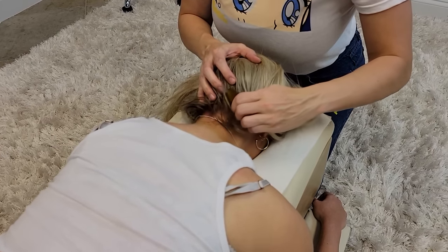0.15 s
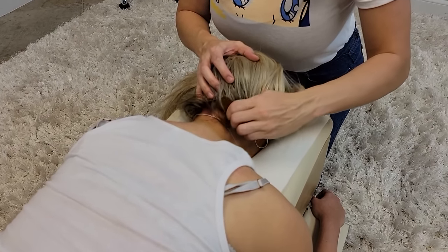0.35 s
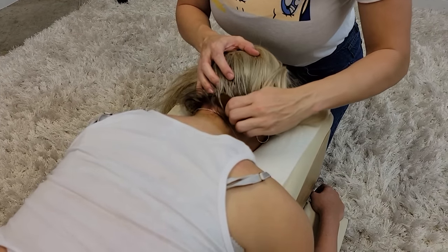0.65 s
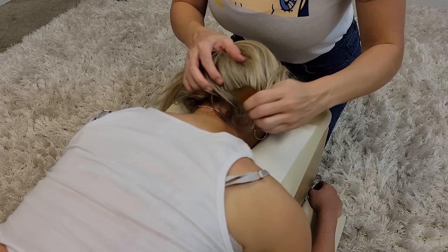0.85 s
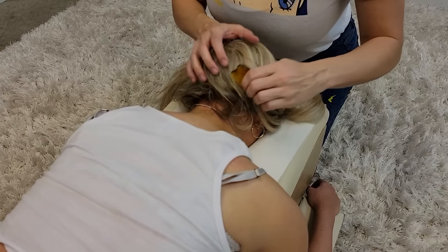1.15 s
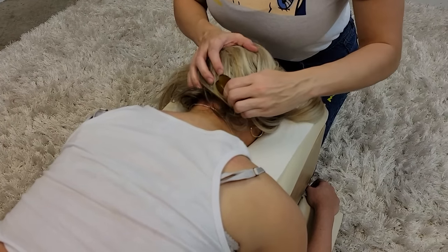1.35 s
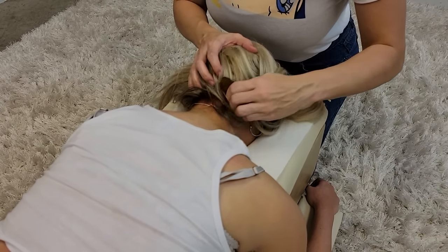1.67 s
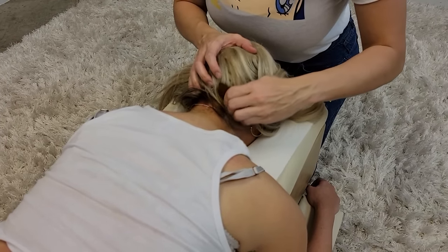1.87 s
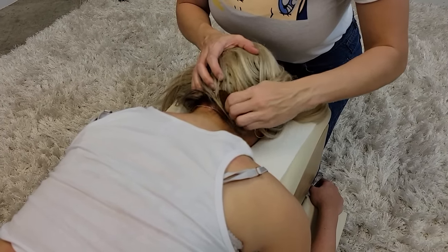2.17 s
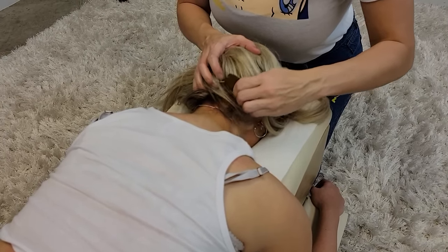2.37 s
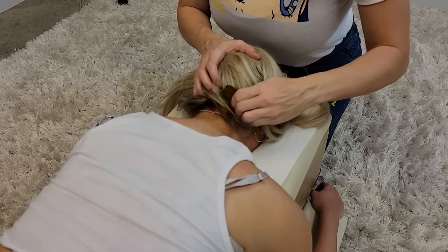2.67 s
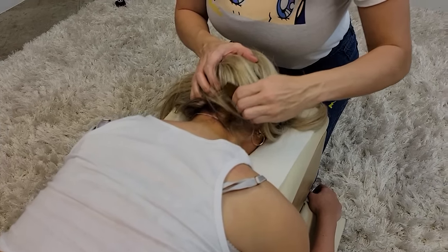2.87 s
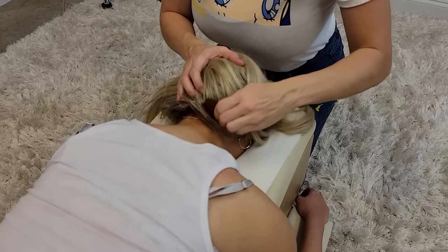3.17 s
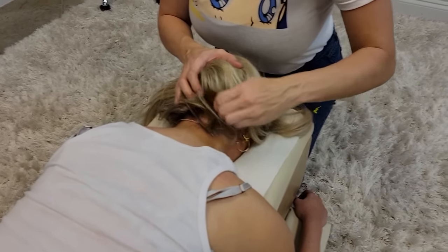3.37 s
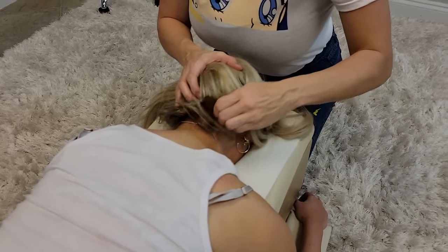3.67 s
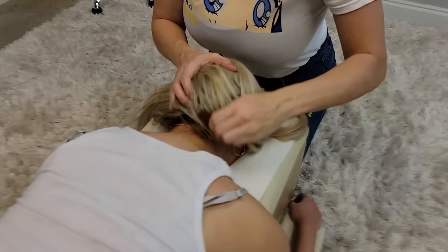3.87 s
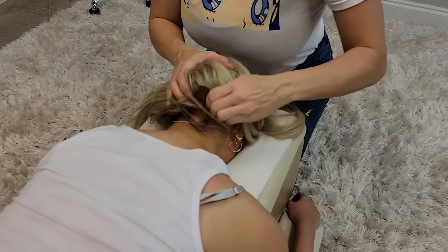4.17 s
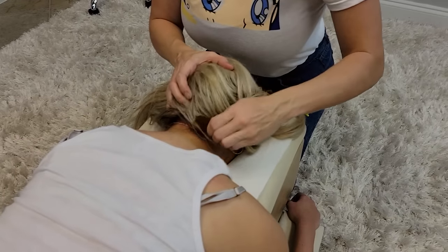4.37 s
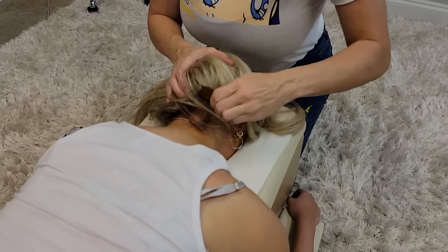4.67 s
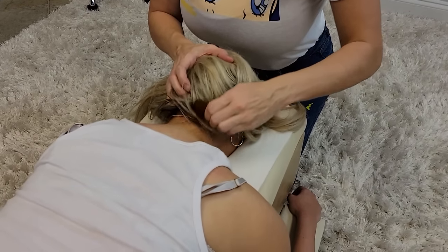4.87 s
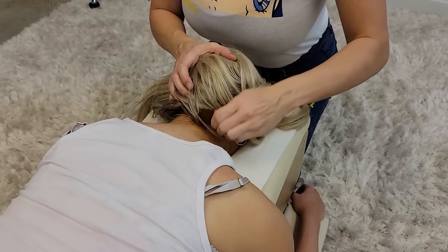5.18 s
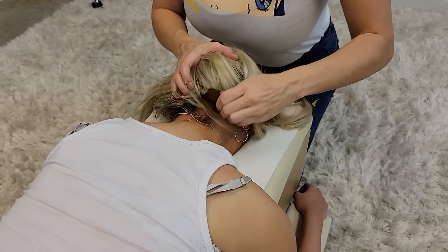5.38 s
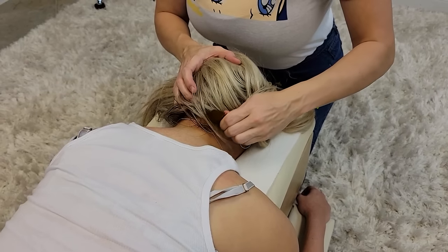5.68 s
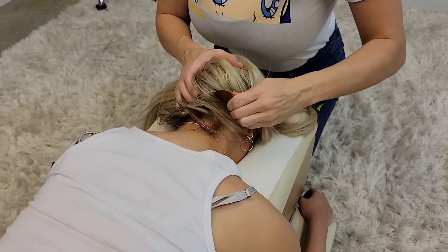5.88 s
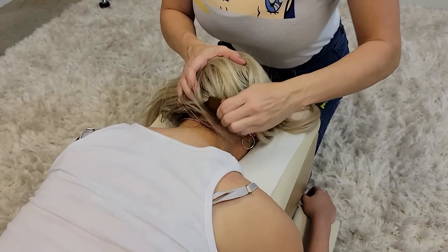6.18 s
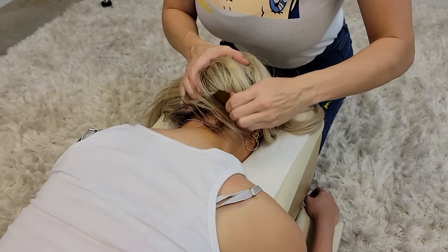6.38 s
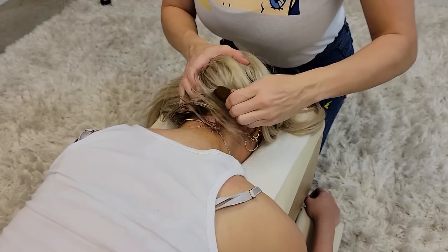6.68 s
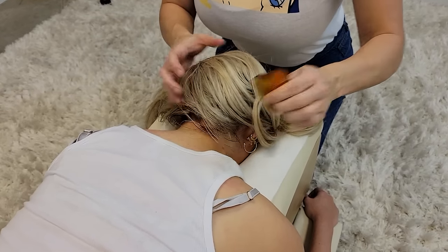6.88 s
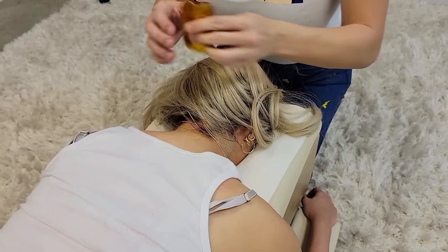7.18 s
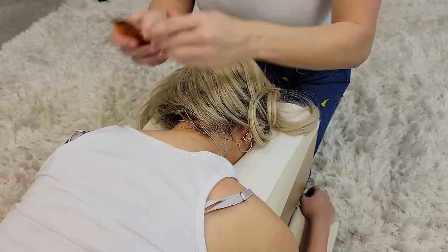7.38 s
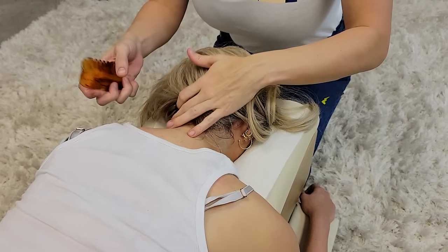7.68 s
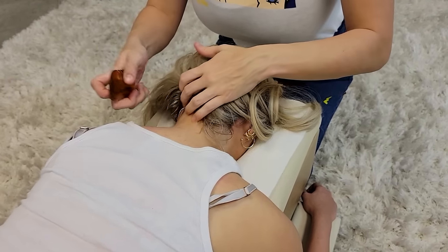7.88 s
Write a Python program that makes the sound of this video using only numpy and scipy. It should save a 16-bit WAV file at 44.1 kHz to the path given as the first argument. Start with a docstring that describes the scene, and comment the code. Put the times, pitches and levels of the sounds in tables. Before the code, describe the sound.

Crisp, dry scratching of a comb through hair, with a few small tooth clicks, in a quiet humming room.

```python
"""Short, dry scratches: a small hard comb and fingertips rub a scalp, with light glides back through
the hair in between. Hairs slip at random, louder the faster the stroke, and the scrape turns hollow
as the comb is pressed on. A few teeth catch, snap free and ring; late on, one rasps out of a tangle,
clothing shifts and a palm smooths the hair. The room is quiet and carpeted, with a low ventilation hum."""
import sys
import numpy as np
from scipy import signal
from scipy.fft import rfft, irfft, next_fast_len
from scipy.io import wavfile
from scipy.ndimage import map_coordinates

SR = 44100
rng = np.random.default_rng(int(sys.argv[2]) if len(sys.argv) > 2 else 0)


def generate_wav(signal):
    """Clip the signal to [-1, 1] and save it as 16-bit WAV at the path in sys.argv[1]."""
    frames = np.transpose(np.atleast_2d(signal))
    scaled = np.clip(frames, -1, 1) * 32767
    pcm = np.round(scaled).astype(np.int16)
    wavfile.write(sys.argv[1], SR, pcm)


N = 354652
TIME_S = np.arange(N) / SR


def amp(db):
    """Decibels to gain."""
    return 10 ** (np.asarray(db) / 20)


def unit_rms(x):
    """x at rms 1."""
    return x / np.sqrt(np.mean(x ** 2) + 1e-20)


def log_interp(points, hz):
    """(freq_hz, value) points read on a log axis."""
    freq_hz, values = np.transpose(points)
    return np.interp(np.log(hz + 1), np.log(freq_hz + 1), values)


def wobble(knots_per_s):
    """Smooth random curve."""
    knots = rng.standard_normal(int(N * knots_per_s / SR) + 4)
    return map_coordinates(knots, [TIME_S * knots_per_s])


def filtered(x, response):
    """x through a complex frequency response."""
    n = x.shape[-1]
    n_fft = next_fast_len(n + SR // 4)
    return irfft(rfft(x, n_fft) * response(np.fft.rfftfreq(n_fft, 1 / SR)), n_fft)[..., :n]


def resonance(f, hz, width_hz):
    """Causal response of one mode."""
    return 1j * f * width_hz / (hz * hz - f * f + 1j * f * width_hz)


def coloured(pair, spectrum, correlation):
    """Two independent signals to stereo at rms 1, with this spectrum and left-right correlation."""
    def mid_side_gains(f):
        angle = np.arccos(np.clip(log_interp(correlation, f), -1, 1)) / 2
        return amp(log_interp(spectrum, f)) * [np.cos(angle), np.sin(angle)]
    mid, side = filtered(pair, mid_side_gains)
    return unit_rms(np.array([mid + side, mid - side]))


def strokes(rows, speed_power=2.3):
    """Gain of hand strokes: each speeds up and slows like a swing; level follows a power of speed."""
    power = np.zeros(N)
    for peak_s, rise_s, fall_s, level_db in rows:
        moving = (TIME_S > peak_s - rise_s) & (TIME_S < peak_s + fall_s)
        offset_s = TIME_S[moving] - peak_s
        speed = np.cos(np.pi / 2 * offset_s / np.where(offset_s < 0, rise_s, fall_s))
        power[moving] += (amp(level_db) * np.abs(speed) ** speed_power) ** 2
    return np.sqrt(power)


# ventilation noise spectra: freq_hz, relative_db
RUMBLE_SPECTRUM = [(5, -1), (16, 2), (25, 2), (40, -5), (62, -15.5), (75, -5.5), (110, -9), (145, -15),
                   (175, -12), (215, -28), (300, -47.5)]
AIR_SPECTRUM = [(100, -30.5), (165, 0), (205, -2), (235, -5), (300, -8), (420, -13), (600, -16.5),
                (780, -21.5), (1100, -23), (1600, -27.5), (2500, -29), (3200, -31), (5000, -34),
                (12000, -34.5), (15800, -42)]
# left-right likeness of that noise: freq_hz, correlation
AIR_CORRELATION = [(30, 0.61), (70, 0.71), (130, 0.31), (250, 0.75), (500, 0.39), (1000, 0.33),
                   (4000, 0.092), (12000, 0.066)]
# room modes: pitch_hz, nominal_width_hz, left_db, right_db
HUM_MODES = [(51.9, 5.5, -73, -56), (75.2, 8, -60, -59), (90, 5.4, -81.5, -57), (104.1, 8.6, -76, -57),
             (121.9, 7.1, -52, -64), (133.46, 5.6, -74, -55), (164.6, 19, -72.5, -65),
             (360.6, 5.3, -80.5, -88)]
def ventilation():
    """Steady rumble and air hiss, plus a hum in room modes that stand differently left and right."""
    rumble = amp(-46.5) * coloured(rng.standard_normal((2, N)), RUMBLE_SPECTRUM, AIR_CORRELATION)
    air = amp(-58.5) * coloured(rng.standard_normal((2, N)), AIR_SPECTRUM, AIR_CORRELATION)
    hum = np.zeros((2, N))
    for pitch_hz, nominal_width_hz, left_db, right_db in HUM_MODES:
        width_hz = 1.89 * nominal_width_hz
        mode = filtered(rng.standard_normal(N), lambda f: resonance(f, pitch_hz, width_hz) ** 2)
        hum += amp([[left_db], [right_db]]) * unit_rms(mode)
    return rumble + air + hum


# near reflections: delay_s, gain_db
REFLECTIONS = [(.0034, -18.5), (.0076, -31), (0.0116, -20), (0.0134, -20)]
# room decay: freq_hz, t60_s
ROOM_DECAY = [(300, 0.43), (3000, 0.16), (8000, 0.1), (15000, 0.09)]
def room(x):
    """Direct sound, a few near reflections and a short, carpet-damped tail."""
    hz, t, noise = signal.stft(rng.standard_normal((2, SR // 3)), SR, nperseg=256)
    decay = amp(-60 * t / log_interp(ROOM_DECAY, hz)[:, None])
    _, tail = signal.istft(noise * decay, SR, nperseg=256)
    tail /= np.linalg.norm(tail[0])
    late = signal.fftconvolve(x.mean(axis=0)[None], tail, axes=1)[:, :N]
    early = sum(amp(gain_db) * np.pad(x, ((0, 0), (round(delay_s * SR), 0)))[:, :N]
                for delay_s, gain_db in REFLECTIONS)
    return x + early + amp(-9.5) * late


# left-right likeness of all rubbing: freq_hz, correlation
RUB_CORRELATION = [(600, 0.99), (1500, 0.76), (3500, 0.91), (7500, 1), (10000, 0.9), (12000, 0.48),
                   (15000, 0.04)]
def friction(spectrum, slips_per_s, spread_db, blur):
    """Single hairs slip at random, in uneven sizes, over a blur of finer contacts."""
    slipping = rng.random(N) < slips_per_s / SR
    size = amp(spread_db * np.clip(rng.standard_normal(N), -2, 2))
    slips = unit_rms(slipping * size * rng.standard_normal((2, N)))
    return coloured(slips + blur * rng.standard_normal((2, N)), spectrum, RUB_CORRELATION)


# clothing movements: peak_s, rise_s, fall_s, level_db
CLOTH_SHIFTS = [(5.72, .24, 0.2, -59), (6.07, 0.38, .33, -60)]
# cloth rustle: freq_hz, relative_db
CLOTH_SPECTRUM = [(50, 9.5), (110, 9), (190, 0), (280, 6.5), (380, 2.5), (560, 2.5), (720, -9), (1000, -16),
                  (2000, -18)]
def clothing():
    """Shifting cloth rubs with a soft, low rustle."""
    return strokes(CLOTH_SHIFTS) * coloured(rng.standard_normal((2, N)), CLOTH_SPECTRUM, RUB_CORRELATION)


# drags through loose hair: peak_s, rise_s, fall_s, level_db
HAIR_DRAGS = [(5.535, 0.072, 0.3, -60), (5.815, .2, 0.074, -55.5), (7.21, .08, .07, -69.5),
              (7.312, .035, .04, -66), (7.44, 0.097, .1, -73), (7.93, 0.32, .5, -65)]
# sliding hair: freq_hz, relative_db
HAIR_SPECTRUM = [(1000, -16), (3000, -7), (5500, -7), (7000, -3), (8300, 3), (9600, -4), (11000, -3),
                 (12000, -4), (13500, -3), (15500, -4.5)]
def loose_hair():
    """Loose hair slides softly under the comb or palm."""
    return strokes(HAIR_DRAGS) * friction(HAIR_SPECTRUM, slips_per_s=4000, spread_db=8, blur=1.3)


# pull on a tangle: peak_s, rise_s, fall_s, level_db
TANGLE_PULL = [(5.825, .11, .044, -56.5)]
# rasping tooth: freq_hz, relative_db
RASP_SPECTRUM = [(800, -18), (2100, -9), (3300, -19), (3750, -8), (4000, 3), (4200, -2), (4600, -11),
                 (5500, -17), (9000, -42)]
def tangle_rasp():
    """One tooth rasps as it pulls out of a tangle."""
    return strokes(TANGLE_PULL) * friction(RASP_SPECTRUM, slips_per_s=1700, spread_db=3, blur=0.8)


# comb body modes: pitch_hz, width_hz, gain_db
COMB_MODES = [(2290, 420, -10), (3470, 570, -11), (4100, 650, -10.5), (4870, 700, -15.5), (7140, 410, -0.5),
              (8150, 800, -4), (8760, 450, -2.5), (11100, 1700, -17), (14900, 830, -22)]
# teeth snapping free: start_s, relative_db, ring_hz, ring_over_body_db, ring_width_hz, chatter_t60_s
TOOTH_SNAPS = [ (1.91, -53, 10200, 0, 2500, .008), (2.254, -49, 10600, 10, 1500, .008),
               (3.5276, -45, 3360, 14, 700, 0.016), (3.5507, -44.5, 3480, 13, 1200, .013),
               (3.708, -54, 2500, 6, 1500, .008), (5.5488, -34, 7200, -14, 700, .0034),
               (5.5745, -24, 7260, -4, 900, 0.0061), (5.5778, -30.5, 7260, -10, 700, 0.0055),
               (5.6514, -28.5, 3750, -13, 150, 0.013), (5.7324, -45, 7050, 7, 700, .005),
               (5.7384, -31.5, 6600, -7, 600, 0.0091), (6.402, -50.5, 2200, 3, 1200, 0.013),
               (6.437, -52, 2100, 8, 1200, .012), (6.501, -55, 2200, 6, 1400, 0.013),
               (7.498, -59, 8300, 10, 500, .03), ]
def tooth_snaps(gain_db=-22):
    """A caught tooth lets go: the comb clicks, chatters briefly and the tooth rings at its own pitch."""
    def comb_response(f):
        return sum((-1) ** k * amp(db) * resonance(f, pitch_hz, width_hz)
                   for k, (pitch_hz, width_hz, db) in enumerate(COMB_MODES))
    out = np.zeros(N + SR)
    t = np.arange(SR // 10) / SR
    for start_s, relative_db, ring_hz, ring_over_body_db, ring_width_hz, chatter_t60_s in TOOTH_SNAPS:
        chatter = 0.16 * rng.standard_normal(len(t)) * amp(-60 * t / chatter_t60_s)
        force = (t == 0) + chatter
        body = unit_rms(filtered(force, comb_response))
        ring = unit_rms(filtered(force, lambda f: resonance(f, ring_hz, ring_width_hz)))
        snap = unit_rms(body + amp(ring_over_body_db) * ring)
        out[round(start_s * SR):][:len(t)] += amp(relative_db + gain_db) * snap
    # so small a body radiates no low notes
    return signal.sosfilt(signal.butter(2, 1150, "highpass", fs=SR, output="sos"), out[:N])


# light return strokes: start_s, length_s, base_db
COMB_GLIDES = [(1.137, 0.075, -71), (2.149, 0.101, -71.1), (2.811, 0.077, -72.3), (2.879, 0.081, -67.5),
               (3.057, 0.114, -69.5), (3.449, 0.167, -67.5), (3.766, 0.14, -67), (3.904, 0.2, -68.5),
               (4.207, 0.14, -69.3), (4.345, 0.21, -67), (4.61, 0.18, -72.9), (4.775, 0.17, -64),
               (5.033, 0.15, -72), (5.183, 0.18, -65.2), (5.949, 0.3, -76.5), (6.47, 0.17, -68.6)]
def glides(ease_s=0.041):
    """Gain of the comb gliding back through the hair: ease in, hold an even speed, ease out."""
    gain = np.zeros(N)
    for start_s, length_s, base_db in COMB_GLIDES:
        from_edge_s = np.minimum(TIME_S - start_s, start_s + length_s - TIME_S)
        gain += amp(base_db) * np.clip(from_edge_s / ease_s, 0, 1)
    return gain


# light and firm scalp scrape, strands on teeth, strands on strands: freq_hz, relative_db
LIGHT_SPECTRUM = [(400, -20), (900, -17), (1500, -6), (2200, 2), (2700, -2), (3500, -1.5), (4100, 3.5),
                  (4700, -3), (5900, -2.5), (6400, -9), (7200, -39)]
FIRM_SPECTRUM = [(500, -24), (1100, -3), (1500, -5.5), (1850, 0.5), (2300, -4.5), (2800, -6.5), (3350, -9),
                 (3650, -7.5), (3950, 2), (4250, -0.5), (4550, -4), (5200, -4), (5700, -14), (7000, -29)]
SWISH_SPECTRUM = [(4500, -23), (6100, -11), (6650, -6), (7000, 0), (7400, 0), (7850, -3), (8400, 0),
                  (8900, -3), (9700, -8), (11000, -25)]
FIZZ_SPECTRUM = [(7000, -31), (9000, -14), (9800, -3.5), (10600, 0), (11500, -6), (12300, -5.5),
                 (13200, -8), (15000, -7.5), (15800, -22)]
# comb pressed on, sounding hollow: time_s, firm_share
COMB_PRESSURE = [(0, 0), (1.5, 0.2), (2.8, 0.45), (3.3, 0.46), (4.1, 0.82), (6.7, 0.82)]
# strokes that reach the scalp: peak_s, rise_s, fall_s, base_db, extra_scrape_db, extra_fizz_db
SCALP_SCRATCHES = [ (0.18, .1, .088, -59.5, -0.5, 0.5), (0.339, .042, 0.16, -70, -2, 3),
                   (0.578, .09, 0.053, -59, -2, 1), (1.23, .074, 0.083, -67, 0, 2.5),
                   (1.432, 0.061, .06, -56.5, -2, -1), (1.618, 0.11, .026, -71, 0, -0.5),
                   (1.723, .065, 0.035, -68.5, -2, 0), (1.873, .095, 0.083, -66, -2, 1),
                   (2.015, .048, 0.099, -61.5, -2.5, -1.5), (2.258, 0.061, 0.041, -65.5, .5, 3.5),
                   (2.425, 0.072, .094, -63, -3.5, -1.5), (2.7, .17, 0.081, -66, 0.5, 2),
                   (3.001, .046, .101, -70.5, -1, -1.5), (3.175, 0.074, 0.098, -62.5, -1.5, 2),
                   (3.273, 0.11, 0.05, -67, 0.5, 2.5), (3.42, .13, 0.023, -67.5, -1, 0.5),
                   (3.635, 0.13, 0.08, -63, -2, -0.5), (3.695, 0.059, 0.075, -68.5, 5.5, 2.5),
                   (4.078, 0.07, 0.093, -63, 0.5, 2), (4.14, 0.058, 0.074, -65.5, 2, 2),
                   (4.555, .14, 0.085, -63.5, 1, 0), (4.93, 0.062, 0.1, -61.5, 1.5, 1.5),
                   (5.386, 0.091, .064, -62.5, 1, 1.5), (5.93, 0.086, .066, -72.5, 2, 1),
                   (6.235, 0.15, 0.074, -64.5, 1.5, 1.5), (6.452, .11, 0.048, -65, 0, 0.5),
                   (6.645, 0.11, 0.092, -65, 5, 5), ]
def scratching(tufts_per_s=130, wavers_per_s=30):
    """Teeth scrape the scalp while strands swish along them and fizz over one another."""
    peak_s, rise_s, fall_s, base_db, extra_scrape_db, extra_fizz_db = np.transpose(SCALP_SCRATCHES)
    glide = glides()

    def envelope(scratch_db, glide_db):
        scratch = strokes(zip(peak_s, rise_s, fall_s, base_db + scratch_db))
        return np.hypot(scratch, amp(glide_db) * glide)

    firm_share = np.clip(np.interp(TIME_S, *np.transpose(COMB_PRESSURE)), 0, 1)
    light = friction(LIGHT_SPECTRUM, slips_per_s=1500, spread_db=0.5, blur=0.79)
    firm = friction(FIRM_SPECTRUM, slips_per_s=900, spread_db=1.5, blur=0.8)
    scrape = np.sqrt(1 - firm_share) * light + np.sqrt(firm_share) * firm
    swish = friction(SWISH_SPECTRUM, slips_per_s=3000, spread_db=2.5, blur=1)
    fizz = friction(FIZZ_SPECTRUM, slips_per_s=1600, spread_db=2, blur=1)
    scrape *= envelope(scratch_db=extra_scrape_db + 0.84, glide_db=-3)
    swish *= envelope(scratch_db=1.9, glide_db=1.4)
    fizz *= envelope(scratch_db=extra_fizz_db + 1.6, glide_db=-2)
    tuft_db = 1.08 * wobble(tufts_per_s)  # hair passes the teeth in small bunches
    waver_db = 0.6 * wobble(wavers_per_s)  # unsteady hand pressure
    return amp(tuft_db + waver_db) * (scrape + swish + fizz)


def scene():
    """The hands work slightly right of centre, over the room's ventilation."""
    rubbing = (scratching() + loose_hair() + tangle_rasp() + clothing()) * amp([[-1.5], [0.5]])
    snaps = tooth_snaps() * amp([[-1.2], [1.2]])
    return room(rubbing + snaps) + ventilation()


def record(dry, cutoff_hz=15800):
    """Brick-wall low-pass."""
    return filtered(dry, lambda f: f < cutoff_hz)


dry = scene()
out = record(dry)
generate_wav(out)
```